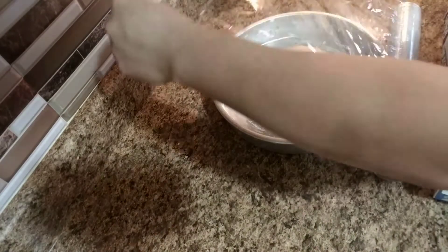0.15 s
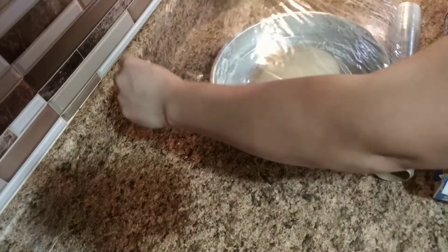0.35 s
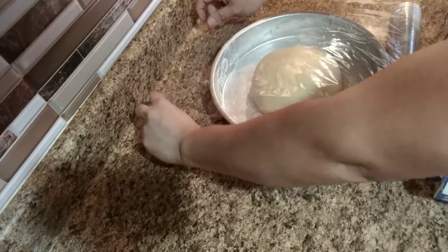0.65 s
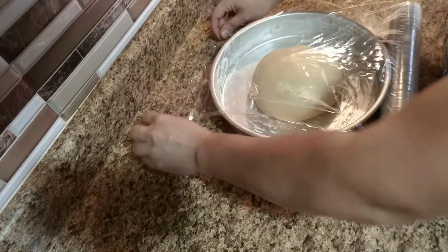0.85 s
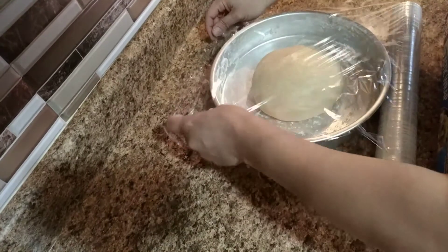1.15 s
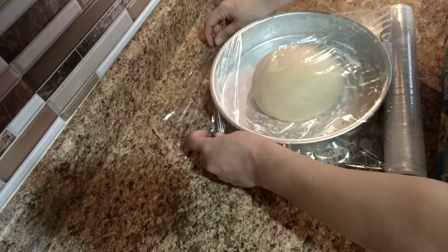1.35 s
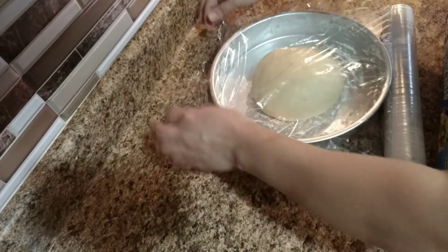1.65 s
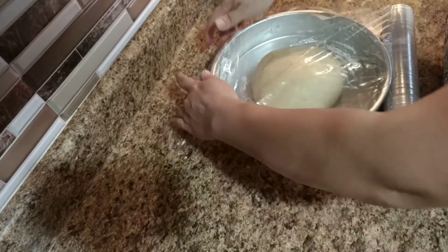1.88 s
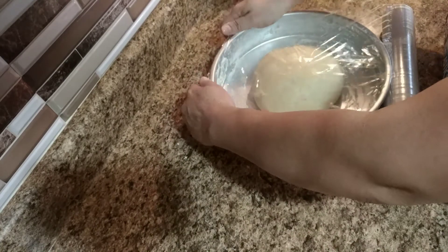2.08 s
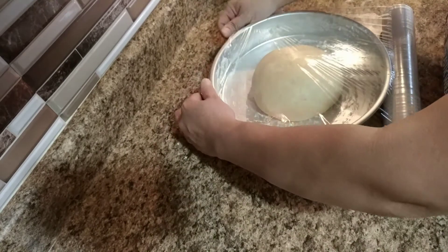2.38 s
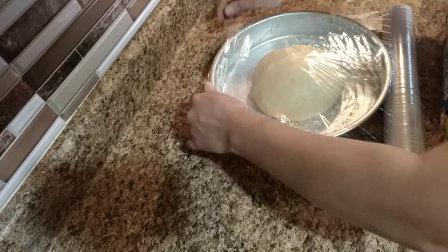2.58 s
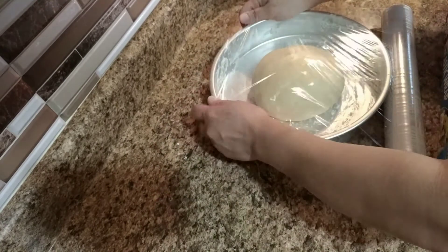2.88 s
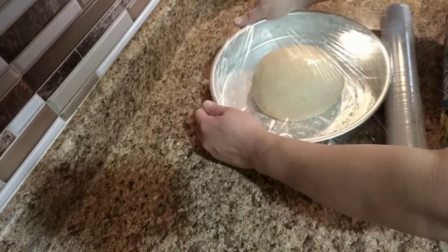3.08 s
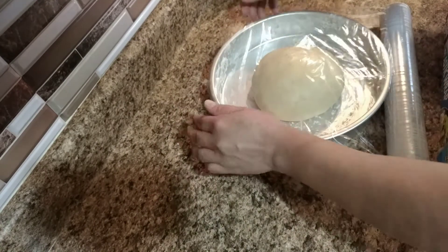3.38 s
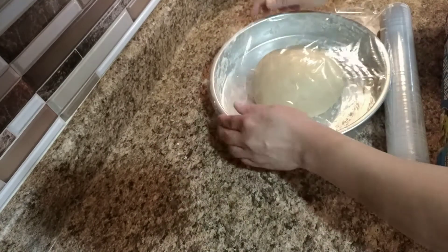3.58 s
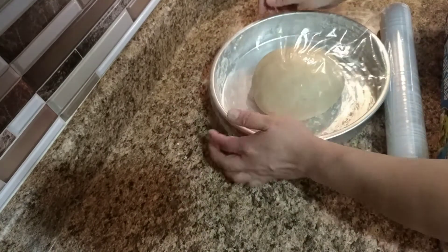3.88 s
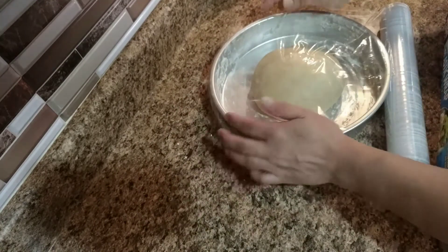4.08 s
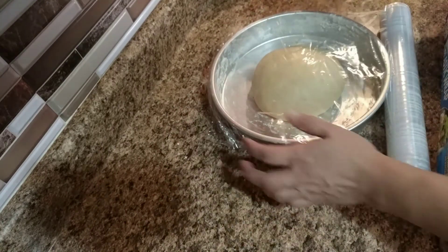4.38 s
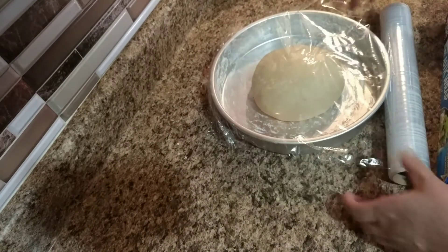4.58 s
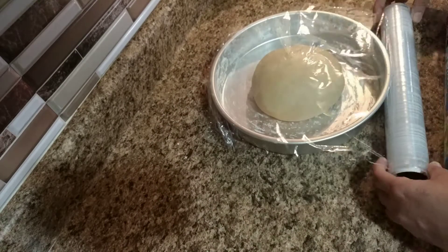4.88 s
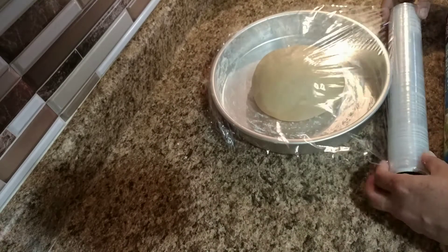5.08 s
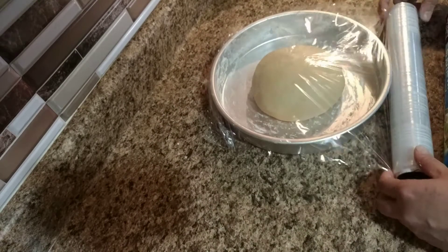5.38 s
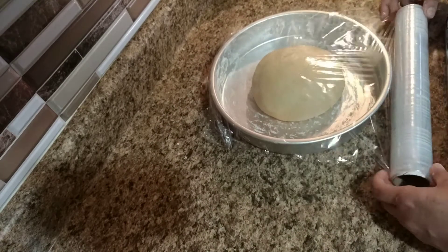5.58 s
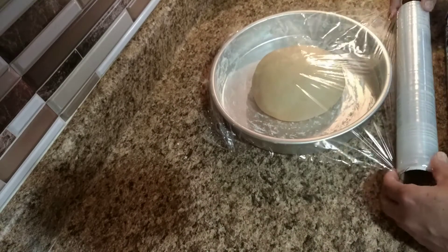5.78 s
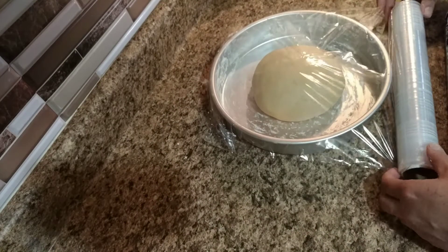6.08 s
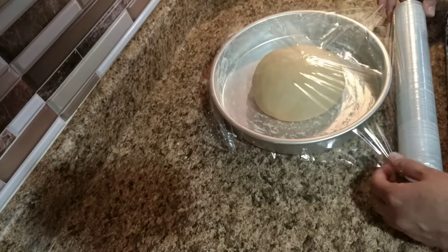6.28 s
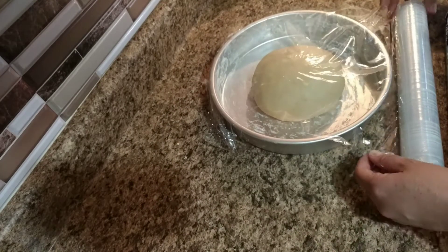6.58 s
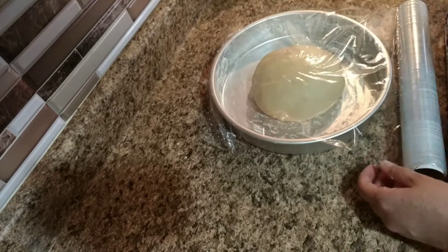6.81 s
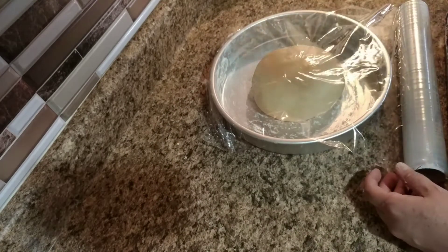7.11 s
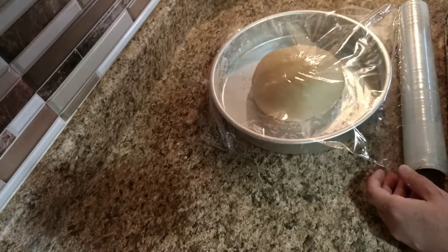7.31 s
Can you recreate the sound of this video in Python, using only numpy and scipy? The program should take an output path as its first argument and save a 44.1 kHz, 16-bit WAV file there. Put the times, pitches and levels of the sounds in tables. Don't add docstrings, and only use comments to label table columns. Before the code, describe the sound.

In a small kitchen, close to the microphone, cling film is tugged over a metal pan with bright, dense crackles, tiny ticks and sharp snaps. The pan is nudged with soft thumps and faint metallic pings. Later a cardboard roll knocks hard and hollow on the heavy stone counter, film snaps free in a quick cluster, and things settle over a quiet fridge hum.

```python
import sys
import numpy as np
from scipy import signal
from scipy.fft import rfft, irfft, next_fast_len
from scipy.io import wavfile
from scipy.ndimage import uniform_filter1d

SR = 44100
rng = np.random.default_rng(int(sys.argv[2]) if len(sys.argv) > 2 else 0)


def log_audio(samples):
    frames = np.atleast_2d(samples).T
    limited = np.clip(frames, -1, 1)
    pcm = np.round(limited * 32767).astype(np.int16)
    wavfile.write(sys.argv[1], SR, pcm)


def attenuation_scalar(level_db):
    decades = np.asarray(level_db, float) / 20
    return 10 ** decades


N = 328537
TIME = np.arange(N) / SR

# f/Hz, level/dB
AIR_COLOUR = [(18, -39), (30, -4.5), (64, -9.5), (112, -1.5), (170, -12.5), (295, -15), (364, -12.5),
              (684, -21.5), (937, -20.5), (1390, -24.5), (2900, -29), (5310, -40), (10800, -39.5),
              (13000, -51), (16000, -40)]
AIR_DB = -62
# f/Hz, level/dB
FRIDGE_HUM = [(60, -67), (120, -69.5), (240, -74.5), (360, -71)]
# f/Hz, t60/s
KITCHEN_DECAY = [(100, 0.23), (400, 0.31), (1500, 0.32), (5000, 0.27), (12000, 0.18)]
# f/Hz, likeness/1
PORT_LIKENESS = [(60, 1), (150, 0.97), (380, 0.81), (950, 0.29), (2380, -0.0058), (5980, -0.11),
                 (15000, 0.1)]
# f/Hz, level/dB
PORT_LEAN = [(60, 0), (130, -1), (290, 0), (640, -2), (1410, 1), (3100, -0.5), (6820, -3.5), (15000, -6)]
# f/Hz, lead/rad
PORT_LEAD = [(60, -0.3), (140, -0.03), (300, -0.3), (900, -0.74), (2200, -2.5), (6000, -2), (15000, -0.7)]
# f/Hz, share/1
DROPOUT_SHARE = [(2500, .0), (3500, .08), (5000, .09), (7500, .05), (9000, .01), (11900, .01), (12600, .55),
                 (13400, .1), (14300, .45), (15000, .03)]
EDGE_HZ = 15900

# peak t/s, rumble level/dB, 20 dB fall/s, scrape over rumble level/dB
HAND_SHIFTS = [(0.0, -49.5, 0.54, -14), (0.56, -48, -0.27, -17), (0.74, -53, 0.3, -8),
               (1.17, -44.5, 0.18, -8), (1.3, -55.5, 0.5, -4), (1.42, -45.5, 0.35, -12),
               (1.6, -45, 0.04, -23), (1.83, -38.5, -0.43, -15), (2.05, -50.5, 0.75, -6),
               (2.45, -47, 0.14, -7.5), (2.8, -49, 0.5, -6.5), (3.15, -47.5, 0.39, -10),
               (3.65, -54, .5, -1), (4.19, -46.5, 0.28, -11), (4.45, -54, 1, -20), (4.7, -45, 0.17, -8),
               (5.08, -50, 0.35, -9), (5.35, -41.5, 0.13, -6), (5.55, -48, 0.7, -7.5),
               (5.87, -32.5, -0.21, -14), (6.08, -52, 0.4, -8), (6.25, -48.5, 0.54, -5),
               (6.56, -54, 0.31, -1.5), (5.58, -42, -0.47, -26), (6.9, -60.5, -0.6, -15),
               (7.15, -57, 0.2, -16), (3.45, -65, 1.5, -10), (2.35, -54.5, 0.14, -8),
               (7.4, -56, 0.9, -13.5)]
SHIFT_RISE, REST_DB = 0.69, -69.5
# f/Hz, level/dB
RUMBLE_COLOUR = [(30, -44.5), (45, -2), (62, -3.5), (100, -7.5), (140, -8), (220, -30.5), (400, -49.5)]
# f/Hz, level/dB
SCRAPE_COLOUR = [(100, -30), (200, -2), (400, -1), (700, -5.5), (1000, -7.5), (1600, -39)]

# t/s, peak level/dB, struck low note f/Hz, board level/dB, tube level/dB
PAN_NUDGES = [(0.056, -33.5, 190, -18, -35.5), (0.663, -41, 135, -13, -30), (0.752, -43.5, 189, 3, -8),
              (1.125, -26.5, 145, -22, -23), (1.169, -31.5, 147, -18, -36), (1.227, -34.5, 132, -10.5, -12),
              (1.339, -39.5, 122, -10, -13), (2.265, -39.5, 129, -10, -9.5), (2.706, -36.5, 142, -18, -13),
              (2.747, -45, 109, -8, 2.5), (2.804, -38, 147, 2, -6), (2.932, -36.5, 186, -12, -9),
              (3.519, -48, 130, -15, -2.5), (4.139, -41, 119, -4, -12), (4.68, -43.5, 113, -10, 2.5)]
# t/s, peak level/dB, struck low note f/Hz, board level/dB, tube level/dB
ROLL_KNOCKS = [(4.987, -20.5, 137, -9, -6), (5.318, -15, 178.6, -3.5, -4), (5.518, -35.5, 143, -4, -12),
               (5.548, -28, 128, -7.5, -19), (5.638, -24.5, 169, -9.5, -18.5), (5.845, -29, 162, 1.5, -2),
               (6.029, -25.5, 174, -4.5, -11.5), (6.229, -19.5, 132, -3.5, -6.5), (6.268, -46, 176, -16, 6),
               (6.552, -33.5, 186, -10, -17), (6.868, -48.5, 135, -22.5, -23), (7.147, -61, 110, -17, -14)]
# t/s, peak level/dB, struck low note f/Hz, board level/dB, tube level/dB
ROCKING_BOUNCES = [(1.112, -34, 185, -15, -16), (1.144, -30.5, 178, -17.5, -33),
                   (4.994, -23.5, 138, -5, -15), (5.008, -28, 138, -6.5, -14), (5.034, -35, 138, -6, -9),
                   (5.339, -22, 136, -14, -3), (5.362, -29.5, 176, -7, -7), (5.395, -35, 172, -6, -1.5),
                   (5.856, -31.5, 180, -14, -32), (6.245, -32, 138, -37, -10), (6.52, -45.5, 142, -4, 0),
                   (5.609, -43.5, 144, -10.5, -12), (4.3, -45.5, 120, -18, -22)]
SECOND_NOTE_DB = {137: -2, 178: -4}
# f/Hz, level/dB, t60/s
BOARD_MODES = [(253.8, 7.5, 0.098), (355, 2, 0.083), (394.7, 5, 0.13), (423, -1.5, 0.12), (458, -3.5, 0.12)]
# f/Hz, level/dB, t60/s
TUBE_MODES = [(536, 10.5, 0.026), (594, -7.5, 0.27), (626.5, -3, 0.16), (653, -3, 0.08), (716, 3, 0.053),
              (842, -0.5, 0.088), (882, -1, 0.11), (1013, -3, 0.1)]
# f/Hz, level/dB, t60/s
PAN_MODES = [(1221, 1, 0.16), (1609, 4, 0.12), (1910, -17, 0.08), (2088, 0.5, 0.079), (2260, -10, 0.12),
             (2440, -5.5, 0.094)]
# f/Hz, level/dB
KNOCK_COLOUR = [(300, -18.5), (600, 2), (770, -10), (950, 2), (1080, -4.5), (1250, -9.5), (1600, -7),
                (2400, -10.5), (3500, -25.5), (6000, -35), (12000, -37)]
# t/s, peak level/dB, upper notes level/dB, ring time/share
RIM_PINGS = [(0.066, -77, 19, 1.2), (1.1226, -56, 6, 1.3), (1.3, -57.5, 15, 0.43), (1.807, -66, 6, 1.1),
             (2.756, -41, -13, 0.42), (2.746, -58, 8, 0.65), (2.9395, -58, 9, 0.42),
             (3.244, -54.5, 8, 0.59), (5.32, -61, 16, 1.2), (5.849, -61.5, 17, 0.36),
             (3.519, -55.5, 9, 0.71), (4.1326, -64, 1, 0.79), (2.799, -68, 14, 1.9)]
NOTE_T60, NOTE_DAMPING = .12, 0.51
CRACK_T60, CRACK_DAMPING = .11, 0.87
BOARD_DAMPING = 1.18

# start t/s, level/dB, length t/s, centre f/Hz, width f/Hz
RIM_SQUEAKS = [
    (0.111, -68.5, 0.11, 3880, 300),
    (0.182, -67, .12, 4060, 350),
    (4.639, -62.5, 0.091, 3180, 600),
    (3.337, -71.5, 0.12, 3750, 250),
    (3.526, -55, 0.07, 714, 70),
    (6.4, -46, 0.031, 1320, 400),
    (6.403, -55, 0.038, 2600, 900),
]
# peak t/s, crackle level/dB, 20 dB fall/s, body over crackle level/dB
FILM_TUGS = [(0.06, -65, .5, -3.5), (1.08, -52.5, 0.7, -10), (1.35, -54.5, 0.3, -3.5),
             (1.83, -40, -0.28, -11.5), (2.44, -51, 0.2, -7.5), (2.71, -40, 0.19, -10),
             (3.03, -51, 0.67, -5.5), (3.4, -76, -1, -6.5), (3.54, -44.5, 0.27, -6.5), (3.65, -46, 0.2, -8),
             (3.82, -45.5, 0.2, -9.5), (4.23, -53, 0.12, -3), (4.565, -53, 0.1, -28), (5.33, -56, 0.4, 4.5),
             (5.46, -56, 0.54, -16), (5.87, -50.5, -3.5, -16), (6.19, -52, .06, -4),
             (6.51, -57.5, 0.36, -4.5), (0.7, -61.5, 0.75, -6.5), (6.62, -65, -0.05, -10)]
# peak t/s, crackle level/dB, 20 dB fall/s, body over crackle level/dB
FILM_STRETCHES = [(.5, -57.5, 0, -15), (.65, -57.5, 0.02, -18), (0.74, -55, 0.05, -12.5),
                  (1.22, -40.5, -0.0349, -4), (1.47, -49.5, 0.06, -5.5), (1.91, -45, 0.11, -9),
                  (2.01, -41, 0.1, -10), (2.13, -44.5, 0.02, -5.5), (2.21, -53, 0.2, -8),
                  (2.305, -40.5, -0.02, -7.5), (2.39, -50, 0.23, -7), (2.84, -42, 0.11, -8),
                  (3.185, -39.5, 0.01, -5), (3.248, -41, 0.04, -6), (4.16, -49.5, 0.0542, -3.5),
                  (4.71, -55.5, 0.15, -6.5), (4.97, -59, 0.01, -2.5), (5.77, -49, -0.58, -13),
                  (6.04, -49.5, -1.24, -7), (6.415, -39.5, 0.01, -10.5), (7.45, -61.5, 0.02, -4)]
TUG_RISE, STRETCH_RISE = 0.17, 1.58
# t/s, crackle level/dB
FILM_CREEP = [(0.0, -66.5), (0.44, -78), (0.56, -69), (1.04, -89), (1.7, -94), (2.6, -66), (4.0, -73),
              (4.45, -73), (4.8, -67.5), (6.3, -59.5), (6.7, -76), (6.9, -79.5), (7.45, -82)]
CREEP_BODY_DB = -8
# t/s, peak level/dB
EDGE_TICKS = [(0.4909, -37), (0.668, -47), (0.731, -40), (2.863, -31), (2.51, -40.5), (1.222, -35),
              (0.969, -46), (1.2096, -37), (2.216, -43), (2.4094, -47), (2.4543, -43), (2.7122, -43),
              (2.78, -43), (2.7972, -27), (2.8361, -27), (3.082, -41), (3.6287, -43), (3.972, -48),
              (4.041, -46), (4.0675, -39.5), (4.163, -29), (4.325, -46.5), (4.4503, -46.5), (4.482, -64),
              (4.5277, -55), (4.5422, -39), (4.635, -46), (4.865, -43), (5.2716, -36.5), (5.697, -36.5),
              (6.039, -39), (6.185, -32), (6.688, -43), (.835, -47), (.861, -48.5), (.942, -47),
              (1.08, -44), (6.268, -38), (6.9244, -52), (1.8108, -41), (2.199, -49), (2.5355, -42),
              (2.6279, -46), (3.0426, -52), (3.1248, -44), (6.896, -61), (3.5218, -38), (5.526, -50),
              (5.572, -56), (5.465, -40), (7.14, -59)]
# f/Hz, level/dB
TICK_COLOUR = [(4000, -34), (6500, -6), (8000, 1.5), (9500, 0.5)]
TICK_T60, SNAP_RISE_S = 0.024, .0016
# t/s, peak level/dB, body over crisp level/dB,
# t60/s
BODIED_SNAPS = [(0.571, -42.5, -30, 0.023), (0.7083, -38, -5, 0.03), (1.2255, -22.5, -9.5, 0.027),
                (1.304, -32, -20, 0.049), (1.824, -35.5, -4, 0.055), (1.963, -40, -2, 0.02),
                (2.2653, -54.5, -9, 0.053), (2.2923, -37, -11, 0.027), (2.6803, -36, -8.5, 0.08),
                (2.697, -33, -12, .03), (2.7444, -31.5, 1, 0.067), (2.9372, -30, -2, 0.043),
                (3.143, -33, -12.5, 0.045), (3.391, -40, -29, 0.044), (3.427, -46, -6, 0.088),
                (3.5308, -37, 0.5, 0.033), (3.56, -28, -16, 0.061), (3.8028, -34.5, -8, 0.04),
                (3.8174, -31, -9, 0.038), (4.1, -40.5, -11, 0.028), (4.1318, -35, -4, 0.042),
                (4.154, -44, -9, .04), (6.0019, -42.5, -7, 0.072), (6.268, -36, -8, 0.031),
                (6.3394, -35.5, -7, 0.058), (6.359, -27.5, -4.5, 0.023), (6.384, -35, -9, .06),
                (6.391, -30, -9, 0.075), (6.397, -26, -11, .04), (6.4037, -22.5, -9, 0.044),
                (6.4091, -31, -6, 0.031), (6.438, -43, -11, 0.035), (6.422, -48, -6, 0.039),
                (1.2335, -39, -2.5, 0.028), (4.988, -48.5, 7.5, .04), (5.319, -40, 4, 0.056),
                (5.85, -57, 0, .015), (6.229, -49, -6, 0.022), (2.6728, -43.5, -7.5, .02),
                (1.8861, -42, -15, 0.026), (3.243, -38, 1.5, 0.034), (5.777, -44.5, -5.5, 0.046),
                (4.681, -47, 3.5, 0.084), (5.355, -43, -7, .04)]
# f/Hz, level/dB
FILM_COLOUR = [(300, -33), (950, -7), (1200, -2.5), (2400, -1), (5000, -0.5), (7600, 0), (9500, 4.5),
               (11000, 8), (12000, 1), (12700, -19), (13300, -9), (14200, -6), (15300, -4), (16000, 1)]


def evened(x):
    return x / np.sqrt(np.mean(x ** 2) + 1e-20)


def read(points, hz):
    f, value = np.transpose(points)
    return np.interp(np.log(hz + 1), np.log(f + 1), value)


def columns(rows):
    s, *values = np.transpose(rows)
    return [np.interp(TIME, s, v) for v in values]


def add(mix, s, sound):
    part = mix[..., round(s * SR):][..., :sound.shape[-1]]
    part += sound[..., :part.shape[-1]]


def noise(count=N):
    return rng.standard_normal((2, count))


def colour(x, points):
    db = read(points, abs(np.fft.fftfreq(4096, 1 / SR)))
    log_gain = np.log(attenuation_scalar(np.maximum(db, -100)))
    taps = np.fft.ifft(np.exp(np.conj(signal.hilbert(log_gain)))).real[:2048]
    return signal.oaconvolve(x, taps[None], axes=1)[:, :x.shape[1]]


def wander(per_s):
    width = max(int(SR / per_s), 2)
    smooth = uniform_filter1d(rng.standard_normal(N), width)
    return evened(uniform_filter1d(smooth, width))


def luck(shape, bins, frames):
    across = uniform_filter1d(rng.standard_normal(shape), bins, axis=-2)
    return evened(uniform_filter1d(across, frames, axis=-1))


def gestures(rows, rise, power):
    grid_s = np.arange(0, N / SR + .002, .002)
    s, db, fall, rel_db = np.transpose(rows)[:4, :, None]
    u = (grid_s - s) / np.maximum(fall, .01)
    distance = np.where(u > 0, u, -u / rise)
    level = attenuation_scalar(2 * (db - 20 * distance ** power))
    carried = level * attenuation_scalar(2 * rel_db)
    return np.array([np.interp(TIME, grid_s, p.sum(0)) for p in (level, carried)])


def air():
    tone = attenuation_scalar(AIR_DB) * evened(colour(noise(), AIR_COLOUR))
    hum = sum(attenuation_scalar(db + 1.8 * wander(3.1)) * np.sin(2 * np.pi * hz * TIME) for hz, db in FRIDGE_HUM)
    return tone + hum


def kitchen(x):
    taps = np.zeros((2, SR // 2))
    at = np.arange(200, SR // 2 - 20, 20) + rng.integers(0, 20, (2, (SR // 2 - 201) // 20))
    np.put_along_axis(taps, at, rng.choice([-1., 1.], at.shape), 1)
    hz, t, z = signal.stft(taps, SR, nperseg=256)
    decay = attenuation_scalar(-60 * t / read(KITCHEN_DECAY, hz)[:, None])
    tail = signal.istft(z * decay, SR, nperseg=256)[1]
    return signal.fftconvolve(x, tail / np.linalg.norm(tail[0]), axes=1)[:, :N]


def hands():
    weight, slide = np.sqrt(gestures(HAND_SHIFTS, SHIFT_RISE, 1.59) + attenuation_scalar(2 * REST_DB))
    rumble = evened(colour(noise(), RUMBLE_COLOUR)) * weight * attenuation_scalar(-2 + 2.4 * wander(18))
    scrape = evened(colour(noise(), SCRAPE_COLOUR)) * slide * attenuation_scalar(2.2 * wander(30))
    return rumble + scrape


def rings(modes, t, rise_s):
    out = 0
    for hz, db, t60 in modes:
        a, b, c = rng.standard_normal(3)
        phase = 2 * np.pi * hz * (1 + .008 * b) * (t - 2 * rise_s) + .35 * c
        out = out + attenuation_scalar(db + 1.5 * a - 60 * t / t60) * np.cos(phase)
    return out * (1 - np.exp(-t / rise_s)) ** 2


def contact(t, soft):
    fade = attenuation_scalar(-60 * t * soft ** CRACK_DAMPING / CRACK_T60)
    attack = np.minimum(t / (.0008 * soft), 1)
    return colour(fade * attack * rng.standard_normal((1, len(t))), KNOCK_COLOUR)[0]


def thuds():
    t, out = np.arange(10000) / SR, np.zeros((2, N))
    for s, db, hz, board_db, tube_db in PAN_NUDGES + ROLL_KNOCKS + ROCKING_BOUNCES:
        soft = attenuation_scalar(-.25 * (db + 20))
        other_hz = 137 if hz > 158 else 178
        notes = [(hz, 0, NOTE_T60 / soft ** NOTE_DAMPING),
                 (other_hz, SECOND_NOTE_DB[other_hz], .13), (63, -11, .2)]
        low = rings(notes, t, 0.00317 * soft)
        damped = [(f, d, t60 / soft ** BOARD_DAMPING) for f, d, t60 in BOARD_MODES]
        both = low + attenuation_scalar(board_db - 5.0) * rings(damped, t, 0.00303 * soft)
        for side in out:
            tube = attenuation_scalar(-10.5) * rings(TUBE_MODES, t, 0.001204 * soft)
            top = tube + attenuation_scalar(6.5) * contact(t, soft)
            add(side, s, -attenuation_scalar(db) * (both + attenuation_scalar(tube_db) * top))
    return out


def pings():
    t, out = np.arange(10000) / SR, np.zeros((2, N))
    for s, db, upper_db, share in RIM_PINGS:
        held = [(hz, mode_db, t60 * max(share, .2)) for hz, mode_db, t60 in PAN_MODES]
        lowest = rings(held[:1], t, 0.00184)
        upper = attenuation_scalar(upper_db - 11.5) * rings(held[1:], t, 0.001144)
        add(out, s, attenuation_scalar(db + 6) * (lowest + upper))
    return out


def squeaks():
    out = np.zeros((2, N))
    for s, db, length, hz, width in RIM_SQUEAKS:
        arch = np.sin(np.pi * np.arange(0, length, 1 / SR) / length) ** 0.44
        band = signal.butter(2, [hz - width / 2, hz + width / 2], "band", fs=SR, output="sos")
        add(out, s, attenuation_scalar(db) * arch * evened(signal.sosfilt(band, noise(len(arch)))))
    return out


def pull():
    creep = attenuation_scalar(2 * columns(FILM_CREEP)[0]) * attenuation_scalar([[0], [2 * CREEP_BODY_DB]])
    tugs = gestures(FILM_TUGS, TUG_RISE, 0.79)
    return np.sqrt(creep + tugs + gestures(FILM_STRETCHES, STRETCH_RISE, 1.65))


def slips(per_s, spread_db, clump_db):
    size = attenuation_scalar(spread_db * np.minimum(rng.exponential(1, N), 5)) * (rng.random(N) < per_s / SR)
    size *= attenuation_scalar(clump_db * wander(120))
    lag = np.clip(np.arange(N) + rng.integers(-16, 17, N), 0, N - 1)
    return evened(np.array([size, size[lag]]) * rng.choice([-1., 1.], (2, N)))


def ticks():
    t, out = np.arange(4000) / SR, np.zeros((2, N))
    for s, db in EDGE_TICKS:
        shape = attenuation_scalar(db - 2.5 - 60 * t / TICK_T60) * np.minimum(t / SNAP_RISE_S, 1)
        add(out, s, shape * noise(len(t)))
    return colour(out, TICK_COLOUR)


def snaps():
    t, crisp, body = np.arange(4000) / SR, np.zeros((2, N)), np.zeros((2, N))
    for s, db, rel_db, t60 in BODIED_SNAPS:
        fade = attenuation_scalar(db - 9 - 60 * t / max(t60, .005)) * (1 + np.exp(-t / .004))
        shape = fade * np.minimum(t / SNAP_RISE_S, 1)
        add(crisp, s, shape * noise(len(t)))
        rounded = uniform_filter1d(shape, 130) * np.minimum(t / .002, 1)
        add(body, s, rounded * noise(len(t)) * attenuation_scalar(rel_db + 11.0))
    return crisp, body


def rim(body):
    t = np.arange(4000) / SR
    ring = sum(attenuation_scalar(db - 60 * t / t60) * np.sin(2 * np.pi * hz * t) for hz, db, t60 in PAN_MODES)
    return attenuation_scalar(-51.5) * signal.oaconvolve(body, ring[None], axes=1)[:, :N]


def film():
    crisp_gain, body_gain = pull()
    snap_crisp, snap_body = snaps()
    crisp = slips(per_s=6000, spread_db=3.3, clump_db=3.2) * crisp_gain + ticks() + snap_crisp
    body = slips(per_s=7000, spread_db=1.5, clump_db=1.0) * body_gain * attenuation_scalar(7.5) + snap_body
    # f/Hz, level/dB
    body_share = [(2500, 0), (4500, -3), (7000, -14), (12000, -40)]
    crisp_share = [(1500, -40), (3000, -14), (4500, -3), (7000, 0)]
    sheet = colour(body, body_share) + colour(crisp, crisp_share)
    z = signal.stft(attenuation_scalar(-0.5) * colour(sheet, FILM_COLOUR), SR, nperseg=256)[2]
    z = z * attenuation_scalar(2.4 * luck(z.shape[1:], bins=7, frames=9))
    return signal.istft(z, SR, nperseg=256)[1][:, :N] + rim(body)


def ports(x):
    size = next_fast_len(N)
    a, b = rfft(x, size)
    hz = np.fft.rfftfreq(size, 1 / SR)
    same = np.clip(read(PORT_LIKENESS, hz), -1, 1)
    lean = attenuation_scalar(read(PORT_LEAN, hz) / 2)
    right = (same * a + np.sqrt(1 - same ** 2) * b) / lean
    right = right * np.exp(-1j * read(PORT_LEAD, hz))
    return irfft([a * lean, right], size)[:, :N]


def scene():
    crackle = film() + squeaks()
    blows = thuds() + pings()
    room = attenuation_scalar(-3.0) * kitchen(crackle) + attenuation_scalar(-8) * kitchen(blows)
    return ports(crackle + blows + room + hands() + air())


def dropouts(x):
    lead, window = 737, signal.windows.kaiser_bessel_derived(2048, 4 * np.pi)
    hz, t, z = signal.stft(np.pad(x, ((0, 0), (lead, 0))), SR, window, nperseg=2048)
    band = np.arange(len(hz)) // 12
    chance = luck((band[-1] + 1, len(t)), bins=1, frames=2)
    rank = chance.ravel().argsort().argsort().reshape(chance.shape) / chance.size
    kept = rank[band] >= read(DROPOUT_SHARE, hz)[:, None]
    z = z * kept * (hz < EDGE_HZ)[:, None]
    return signal.istft(z, SR, window, nperseg=2048)[1][:, lead:lead + N]


def band_limit(x):
    return signal.sosfilt(signal.butter(12, 16760, fs=SR, output="sos"), x)


def record(dry):
    bass_cut = signal.butter(3, 40, "high", fs=SR, output="sos")
    mix = dropouts(signal.sosfilt(bass_cut, dry))
    return band_limit(mix)


dry = scene()
out = record(dry)
log_audio(out)
```